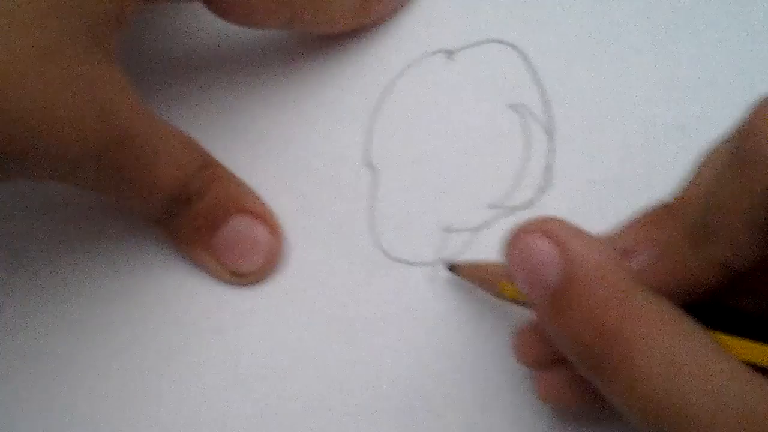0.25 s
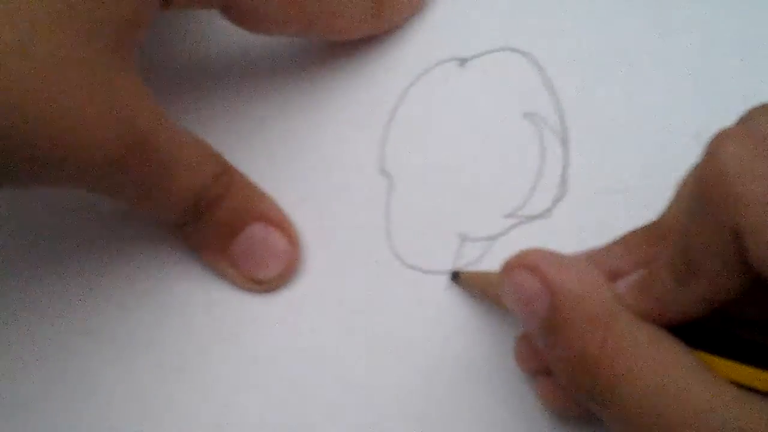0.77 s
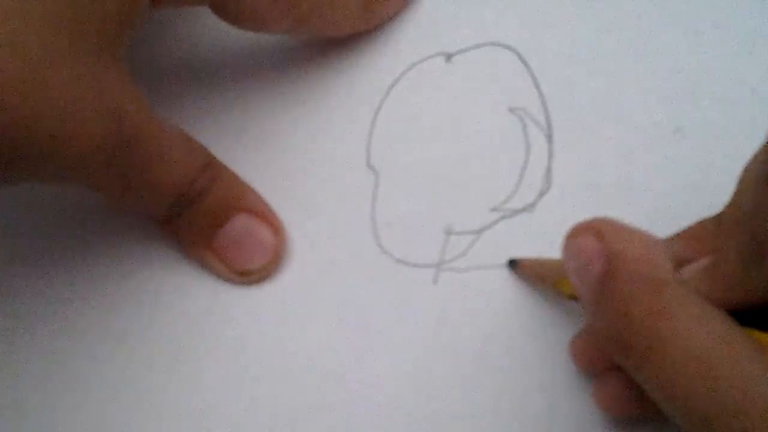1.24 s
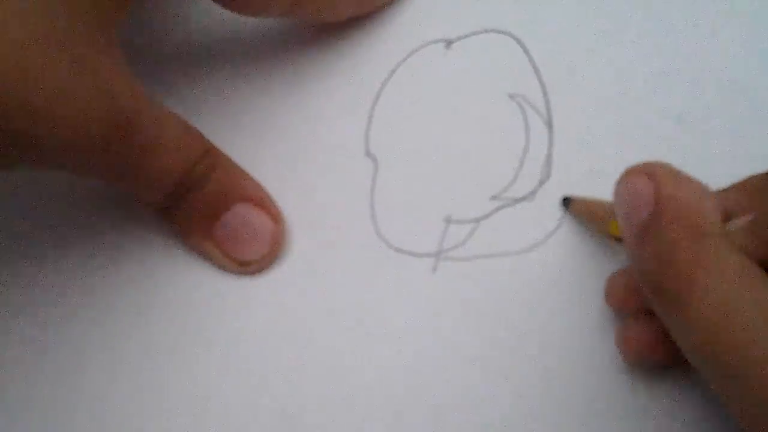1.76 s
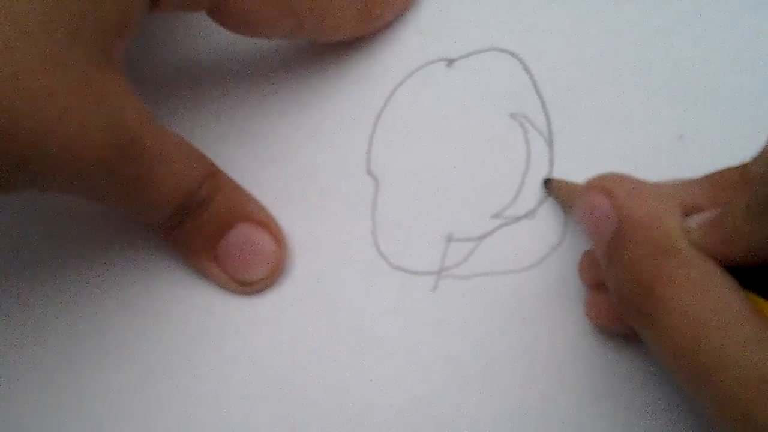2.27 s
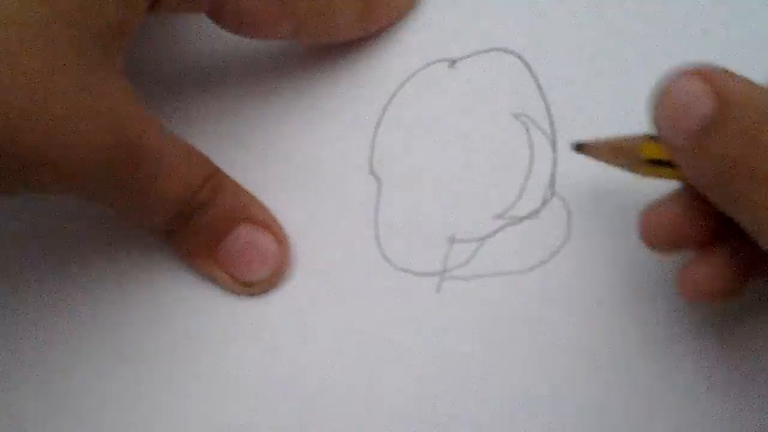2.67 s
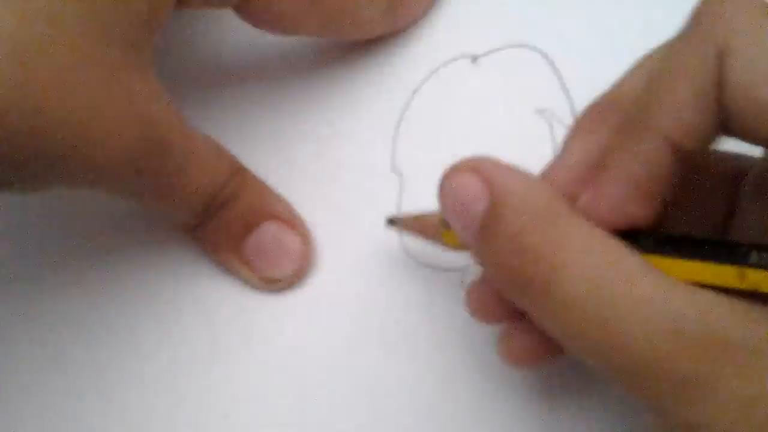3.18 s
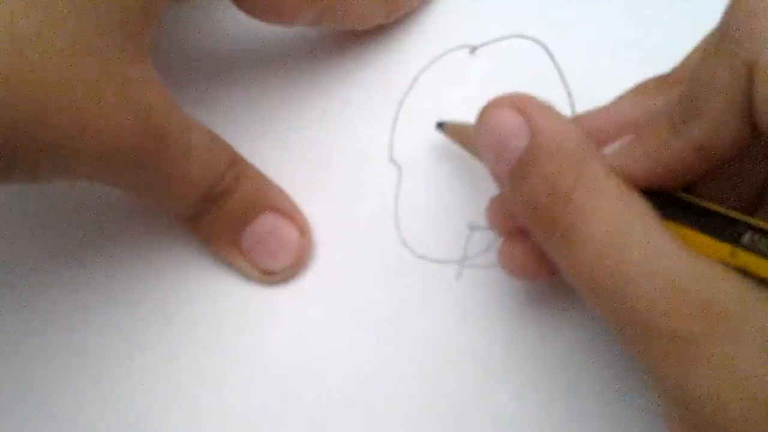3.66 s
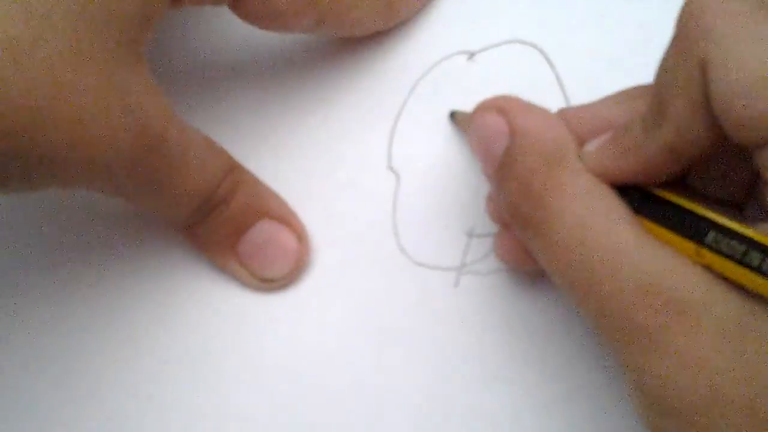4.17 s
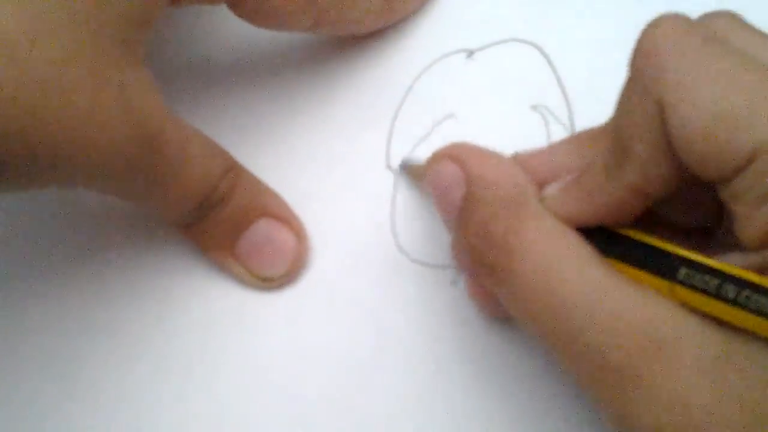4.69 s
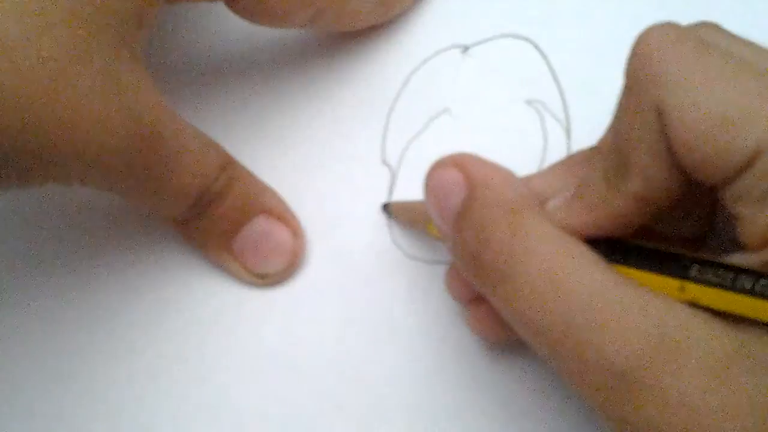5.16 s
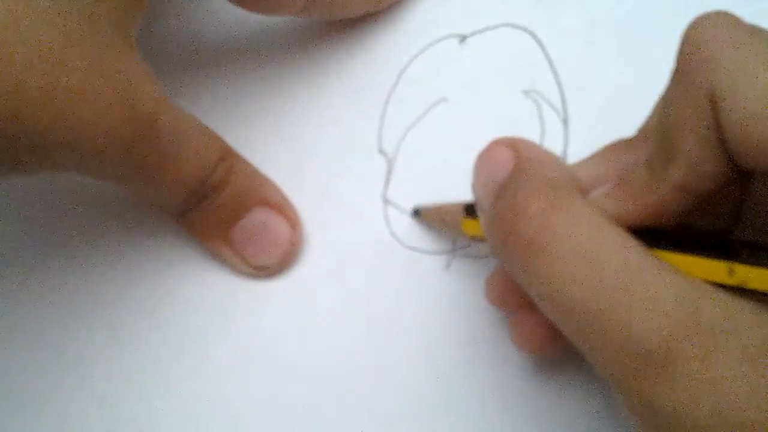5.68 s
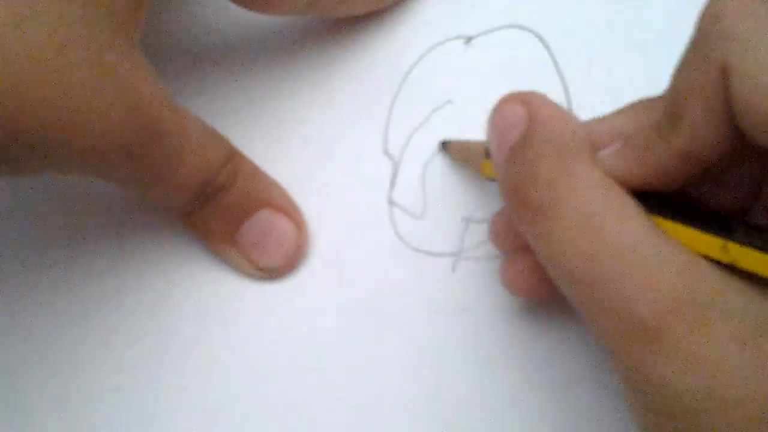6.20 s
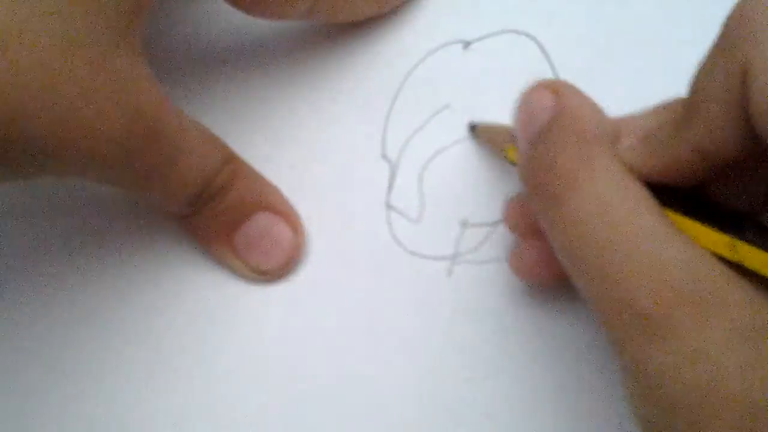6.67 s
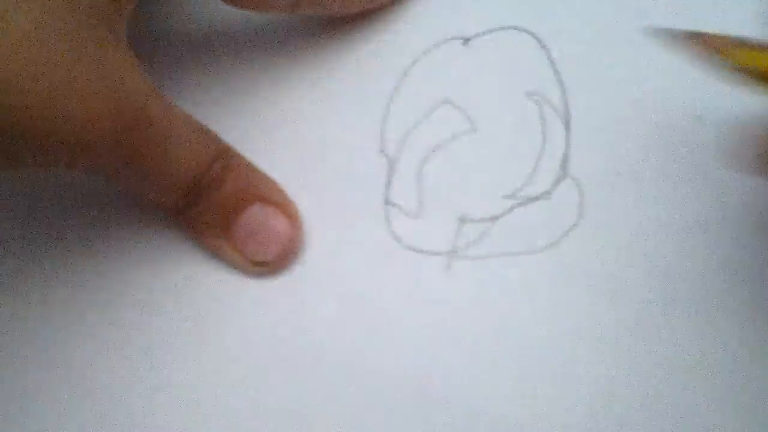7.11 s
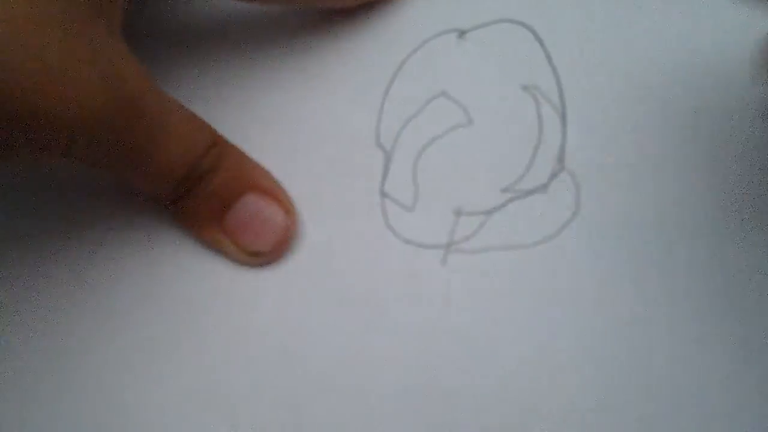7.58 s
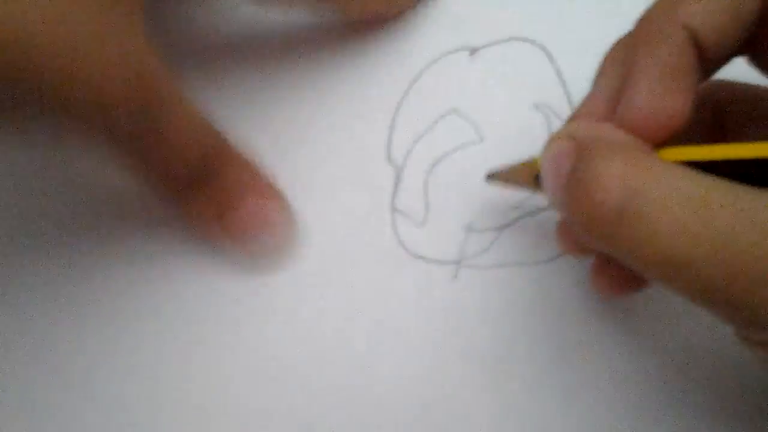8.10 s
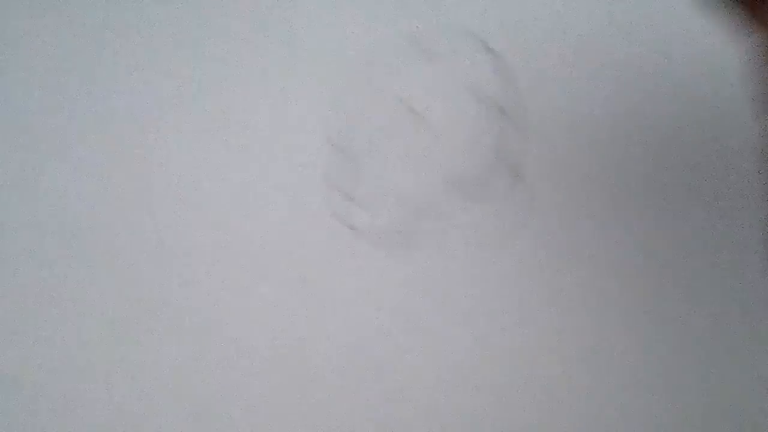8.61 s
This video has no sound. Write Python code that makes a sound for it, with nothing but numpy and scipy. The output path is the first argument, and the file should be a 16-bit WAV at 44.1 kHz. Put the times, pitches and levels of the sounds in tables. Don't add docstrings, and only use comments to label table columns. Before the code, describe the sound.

A pencil scratches in short, uneven strokes on paper with crisp ticks and soft hand thumps, then knocks once on a wooden table.

```python
import sys
import numpy as np
from scipy import signal
from scipy.fft import rfft, irfft, next_fast_len
from scipy.io import wavfile
from scipy.ndimage import uniform_filter1d

SR = 44100
rng = np.random.default_rng(int(sys.argv[2]) if len(sys.argv) > 2 else 0)


def dump(signal):
    limited = np.clip(np.atleast_2d(signal).T, -1, 1)
    pcm = np.round(limited * 32767).astype(np.int16)
    wavfile.write(sys.argv[1], SR, pcm)


def how_loud(loudness_db):
    steps = np.asarray(loudness_db, float) / 20
    return 10 ** steps


N = 390285

# start in seconds, peak level in dB, ring in Hz.
THUMPS = [(0.0586, -34, 950), (1.361, -29.5, 430), (1.4355, -33, 260), (1.459, -28, 400),
          (1.4832, -33, 310), (1.5212, -32, 300), (1.5995, -32, 545), (2.556, -41, 474), (2.826, -39, 510),
          (3.0845, -19.5, 384), (3.463, -24.5, 260), (3.486, -28.5, 514), (4.153, -37, 513),
          (4.1857, -33, 567), (4.2768, -34.5, 580), (4.3214, -38.5, 247), (5.2415, -39.5, 960),
          (6.1228, -27.5, 610), (6.1372, -32, 322), (6.334, -39, 445), (7.0043, -24.5, 900),
          (7.0538, -28, 360), (7.1927, -27, 320), (7.4625, -21.5, 536), (7.5089, -29, 250),
          (8.5012, -24, 496), (8.5737, -25.5, 289), (8.59, -21, 500), (8.6503, -25, 720),
          (8.724, -30.5, 640)]
# start in
# seconds, peak level in dB, ring in Hz.
NUDGES = [(1.418, -31, 600), (1.3485, -36.5, 267), (1.552, -36.5, 250), (4.006, -40, 327),
          (4.071, -40, 530), (4.123, -34.5, 554), (4.232, -37.5, 474), (6.1158, -31, 330),
          (7.205, -30, 297), (7.2947, -31, 277), (7.486, -35, 405), (7.997, -32.5, 435), (8.015, -35, 530),
          (8.479, -30, 590), (8.7852, -35, 560), (8.2675, -9, 590), (8.2742, -10, 590)]
# pitch in Hz, level in dB, decay (t60) in seconds.
STRUCK = [(337.7, -4, 0.3), (591, 2.5, 0.12), (662, -3, 0.06), (877, -1.5, 0.043), (956, -5.5, 0.18),
          (1275, -7.5, 0.042), (1714, -35, 0.07), (2000, -11, 0.04), (2400, 0.5, 0.013), (2830, 3.5, 0.021),
          (3600, -33, 0.076), (4950, -1, 0.013), (7600, -7.5, 0.0045)]
# centre in Hz, width in Hz, level in dB.
PENCIL = [(1220, 1270, 4.5), (2000, 1450, 10)]


def rms_one(x):
    return x / np.sqrt(np.mean(x ** 2) + 1e-20)


def edge(x, hz, kind, order=2):
    hz = np.clip(hz, 10, .45 * SR)
    return signal.sosfilt(signal.butter(order, hz, kind, fs=SR, output="sos"), x)


def fibre_hiss(x):
    return edge(edge(x, 4800, "high"), 10200, "low", order=1)


def drift(rate):
    r = np.exp(-2 * np.pi * rate / SR)
    settle = 9000
    wander = signal.lfilter([1], [1, -2 * r, r * r], rng.standard_normal(N + settle))
    return rms_one(wander[settle:])


def ring(x, hz, t60):
    r, w = how_loud(-60 / (t60 * SR)), 2 * np.pi * hz / SR
    return signal.lfilter([0, np.sin(w)], [1, -2 * r * np.cos(w), r * r], x + 1e-18)


def body(x, modes):
    out = 0
    for k, (hz, width, db) in enumerate(modes):
        r = np.exp(-np.pi * width / SR)
        a = [1, -2 * r * np.cos(2 * np.pi * hz / SR), r * r]
        resonance = (1 - r * r) / 2 * signal.lfilter([1, 0, -1], a, x)
        out = out + (-1) ** k * how_loud(db) * resonance
    return rms_one(out)


def curve(rows):
    s, db = np.transpose(rows)
    return how_loud(np.interp(np.arange(N) / SR, s, db, left=-120, right=-120))


def add(track, s, sound):
    at = round(s * SR)
    track[at:at + len(sound)] += sound[:N - at]


def unit_click(size):
    return np.eye(1, size)[0]


def rubbing():
    # time in seconds, sheet ring in dB, pencil shaft in dB.
    pressed = [(0, -1.5, 2), (2.0, -2.5, 2.5), (2.7, -1.5, 3.5), (3.4, 2, -1), (3.8, 2, 0.5),
               (4.45, -2.5, -0.5), (4.8, -2.5, 0), (5.3, -3, 2.5), (6.0, -1, 2), (6.15, -3, -1),
               (6.6, -4.5, 4), (7.0, 2, -0.5), (8.1, 2, -0.5), (8.4, -2, 3), (8.85, 0, 3)]
    # centre in Hz, width in Hz, level in dB.
    table_modes = [(162, 172, -10), (260, 165, -1), (400, 297, -0.5), (580, 154, 1), (850, 334, -11)]
    # centre in Hz, width in Hz, level in dB.
    sheet_modes = [(3700, 765, 11.5), (4700, 2560, -0.5)]
    pencil, table, bare = strokes()
    s, *columns = np.transpose(pressed)
    sheet_db, shaft_db = [np.interp(np.arange(N) / SR, s, c) for c in columns]
    force = fibres()
    hiss = rms_one(fibre_hiss(force))
    middle = how_loud(shaft_db) * body(force, PENCIL) + lead(force)
    middle = middle - how_loud(sheet_db - 0.5) * body(force, sheet_modes)
    through = edge(middle, 9600, "low") + how_loud(-4.5) * crackle()
    return pencil * through + table * body(force, table_modes) + bare * hiss


def strokes():
    # fastest moment, rise and fall in seconds,
    # pencil and sheet level in dB, table relative to it in dB; the next three tables alike.
    scratches = [(0.229, .063, 0.092, -43, 0), (0.389, .072, .14, -63, 5), (0.506, .041, .063, -56.5, 2.5),
                 (0.745, .073, 0.051, -49, 4), (1.351, 0.02, .077, -55.5, 6), (1.426, .052, 0.26, -54, 4.5),
                 (1.671, .028, 0.09, -62, 6), (1.837, .13, .099, -55.5, 2.5), (2.021, 0.042, .26, -57.5, 1),
                 (2.281, .057, 0.057, -56, 2), (2.392, 0.079, .076, -65.5, 4), (2.498, .078, .033, -66, 6),
                 (2.674, .2, .15, -64, 5), (2.778, .03, .16, -60.5, 5), (2.965, .013, .055, -60, 2),
                 (3.07, .13, 0.12, -53, 5.5), (3.104, .03, .035, -38, -10), (3.24, 0.042, .084, -61.5, 4.5),
                 (5.06, .1, 0.13, -72.5, 2), (5.431, .0053, 0.11, -67, 2), (5.562, .0037, .17, -67, 1.5),
                 (6.592, .098, .07, -62, 0), (6.742, .081, .027, -63, 5), (8.16, 0.083, 0.035, -35.5, -1.5)]
    # fastest moment, rise, fall in seconds, level, table in dB.
    slides = [(0.013, .044, .11, -58.5, 3), (0.616, .12, .21, -61.5, 3.5), (1.03, .43, .4, -56, 3.5),
              (1.945, .065, .064, -58.5, -1.5), (3.401, .086, .195, -55, 3.5),
              (3.838, .23, 0.075, -54.5, -1.5), (3.931, 0.055, .33, -54, -2), (4.17, 0.029, .06, -51.5, -6),
              (4.263, 0.076, 0.1, -55, -2), (4.436, 0.038, 0.063, -64, -3), (4.484, .01, 0.053, -63, 3.5),
              (4.69, 0.037, .25, -63.5, 0), (4.93, .02, 0.09, -63, 4), (5.275, 0.066, 0.076, -65, 2.5),
              (5.686, .004, 0.068, -64, -8), (5.805, .076, 0.069, -61, 4.5), (6.018, .1, 0.032, -61.5, 4),
              (6.345, 0.039, 0.06, -61.5, 2.5), (7.185, 0.4, 0.064, -48.5, 3.5),
              (7.413, 0.1, .239, -59.5, 4), (7.981, 0.25, .02, -53.5, -2), (8.021, .36, .02, -58, -2),
              (8.155, .35, .6, -50, 1), (8.583, 0.17, .018, -42.5, -1)]
    # fastest moment, rise, fall in seconds, level, table in dB.
    scuffs = [(1.164, 0.0037, 0.072, -58.5, 9), (3.18, .092, 0.041, -57.5, 3.5),
              (3.47, 0.018, 0.016, -32.5, -10), (3.533, 0.028, 0.036, -62, 2),
              (3.705, .14, 0.023, -57.5, 1), (4.705, .02, 0.18, -61.5, 5.5), (5.1, 0.018, 0.042, -77, 3),
              (7.075, 0.045, 0.057, -34, -4), (7.0, 0.058, 0.083, -44.5, 3), (7.671, 0.12, .7, -56.5, 4.5),
              (8.216, 0.0071, 0.015, -34.5, -6), (8.506, 0.16, .022, -49.5, 11),
              (8.588, 0.033, 0.18, -42, 6), (8.78, 0.025, 0.066, -51.5, 9.5), (5.245, .004, .03, -62.5, 9),
              (0.166, .004, 0.011, -51.5, -3), (0.029, .004, 0.0055, -49.5, -11),
              (6.178, 0.0044, 0.0092, -55, 3), (7.134, .003, .008, -42, -10), (3.088, .008, .03, -39, -6),
              (3.128, .02, 0.016, -41, -8), (3.452, .008, .01, -48, 3), (7.335, .025, .014, -41, -3),
              (5.475, .04, .06, -69, 1), (6.06, .05, 0.055, -62, 3), (5.988, .004, .04, -61, 2),
              (6.408, 0.027, 0.088, -58, 0), (6.86, 0.095, .1, -60, -4), (1.337, .004, 0.033, -55.5, 8.5),
              (5.16, 0.035, 0.082, -66, 0), (8.025, .02, .006, -52, -6)]
    # fastest moment, rise, fall in seconds, level, table in dB.
    drags = [(6.13, 0.027, .1, -54.5, 7), (6.19, 0.16, 0.13, -54, 0), (7.195, .006, .23, -48.5, 5),
             (7.302, 0.011, 0.051, -34.5, -4), (4.59, .02, .08, -59, -6), (6.27, .05, .07, -61, -3),
             (6.46, .04, .03, -62, 2), (7.52, 0.048, 0.024, -42.5, 1.5), (8.36, .033, 0.079, -37.5, 1)]
    t = np.arange(0, N + 44, 44) / SR
    rest_db = [[-73], [-73], [-73.5]]
    power = how_loud(rest_db) ** 2 * np.ones(len(t))
    slip_s, slip_db = 0.0042, -22.5
    slips = [(s, slip_s / 3, slip_s * 2, db + slip_db, -6.0) for s, db, hz in THUMPS + NUDGES]
    kinds = (scratches, -1), (slides, -4.5), (scuffs + slips, -6.5), (drags, -13.5)
    for rows, hiss_db in kinds:
        for s, rise, fall, db, table_db in rows:
            away = np.abs(t - s) / np.where(t < s, rise, fall)
            bell = how_loud(db - 20 * np.minimum(away, 4) ** 2.6)
            power = power + (bell * how_loud([[0], [table_db], [hiss_db]])) ** 2
    return [np.interp(np.arange(N) / SR, t, np.sqrt(p)) for p in power]


def fibres():
    grains_per_s, spread_db, clump_db = 3000, 3, 1.48
    sizes = how_loud(spread_db * np.minimum(rng.exponential(1, N), 5)) * rng.choice([-1, 1], N)
    grains = rms_one(sizes * (rng.random(N) < grains_per_s / SR))
    return (grains + rng.standard_normal(N)) * how_loud(clump_db * drift(100))


def lead(force):
    # time in seconds, centre in Hz, level in dB.
    tilt = [(0.0, 3070, 3.5), (1.26, 2970, 3.5), (1.31, 3120, 3.5), (2.93, 3020, 3.5), (3.13, 3290, 3.5),
            (3.94, 3350, 3.5), (4.09, 3050, 3.5), (6.46, 3130, 3.5), (6.51, 2730, 3.5), (6.61, 3170, 3.5),
            (6.95, 2950, 3.5), (7.07, 3370, 3.5), (7.74, 3290, 3.5), (7.91, 3510, 3.5), (8.28, 2850, 3.5),
            (8.5, 2930, 3.5), (8.53, 3140, 3.5), (8.85, 2980, 3.5)]
    s, hz, db = np.transpose(tilt)
    t = np.arange(N) / SR
    centre_hz = np.clip(np.interp(t, s, hz), 2500, 4100)
    out = 0
    for stop_hz in np.linspace(2500, 4100, 5):
        near = np.clip(1 - np.abs(centre_hz - stop_hz) / 400, 0, 1)
        out = out + near * body(force, [(stop_hz, 555, 0)])
    return how_loud(np.interp(t, s, db)) * out


def crackle():
    flecks_per_s = 270
    sizes = how_loud(5.4 * np.minimum(rng.exponential(1, N), 3.2)) * rng.choice([-1, 1], N)
    born = rng.random(N) < flecks_per_s / SR
    patch = rng.integers(0, 9, N)
    pitches = np.geomspace(1300, 5000, 9)
    return rms_one(sum(ring(sizes * born * (patch == k), hz, 6.6 / hz) for k, hz in enumerate(pitches)))


def ticks():
    # start in seconds, peak level in dB, ring in Hz.
    crisp = [(0.0185, -30, 9000), (0.029, -25, 2860), (0.163, -32, 2400), (0.1969, -18, 4250),
             (0.2231, -19, 7000), (0.7544, -23, 2920), (1.011, -24, 2000), (1.3522, -26, 4400),
             (1.4434, -25.5, 2680), (1.506, -24.5, 4200), (1.5532, -26.5, 2500), (1.819, -20, 3500),
             (1.871, -26, 3300), (1.9458, -28, 2910), (2.776, -30.5, 3000), (3.0266, -18.5, 3300),
             (3.064, -21, 3400), (3.8475, -23.5, 3600), (3.925, -21.5, 3400), (3.9424, -22.5, 3600),
             (3.963, -27, 3320), (4.008, -27.5, 3040), (4.122, -25, 2280), (4.3437, -38, 4200),
             (5.999, -24.5, 2150), (7.135, -17, 3470), (7.4045, -23.5, 3400), (8.0423, -21, 3900),
             (8.1045, -18.5, 3200), (8.678, -19, 2200), (8.695, -21, 6000)]
    # start in seconds, peak level in dB, ring in Hz.
    taps = [(0.059, -22, 1900), (1.2819, -31, 2220), (1.598, -31, 2000), (3.0863, -14, 3140),
            (3.463, -14, 3880), (3.7203, -29, 3400), (3.7477, -26, 3600), (3.775, -26, 3600),
            (3.7973, -22, 3700), (3.8283, -20.5, 3560), (4.0727, -29, 3000), (4.1724, -25, 3130),
            (5.045, -34.5, 3120), (5.2418, -31, 1410), (5.562, -37, 3200), (6.094, -31, 2600),
            (7.1768, -19, 3280), (7.2199, -14, 4560), (7.4626, -18, 1500), (7.5072, -10, 3180),
            (7.535, -11.5, 3060), (7.9138, -21.5, 3700), (7.9817, -15, 3550), (7.9977, -25, 2860),
            (8.0716, -21, 3700), (8.1225, -16, 3400), (8.1517, -13, 1920), (8.22, -9, 3020),
            (8.6135, -12, 1900), (8.662, -21, 2700)]
    # start in seconds, peak level in dB.
    flecks = [(0.388, -36), (0.703, -32), (0.8672, -35), (0.9056, -37), (1.3764, -29), (1.611, -35),
              (1.767, -34), (1.787, -34), (1.7924, -32), (2.115, -32), (3.192, -40), (3.266, -34),
              (3.863, -30), (4.0395, -31), (4.235, -32), (4.296, -35), (5.431, -43), (5.491, -41),
              (6.583, -36), (6.614, -33), (7.2685, -28.5), (7.921, -34), (8.6734, -23)]
    # start in seconds, peak level in dB (raised by 5 dB
    # below), ring in Hz.
    snaps = [(0.2219, -21, 2780), (0.7464, -29, 1240), (1.4112, -35, 2090), (1.4298, -29, 3230),
             (3.0934, -16, 3300), (3.1024, -17, 1890), (3.3787, -32, 3100), (3.758, -33, 1260),
             (3.8442, -28.5, 2960), (3.9172, -27, 2710), (3.9372, -26.5, 3450), (3.9674, -36, 2960),
             (3.9737, -34, 3830), (4.1564, -30, 3070), (4.1834, -31, 1780), (4.2767, -37, 1650),
             (4.2804, -32, 2830), (4.297, -39, 3020), (4.4714, -50, 2570), (4.5835, -43, 2470),
             (4.7217, -42, 1430), (4.7544, -47, 1200), (5.622, -45, 1500), (5.6474, -48, 2970),
             (5.6954, -44, 2980), (6.113, -35, 3140), (6.1359, -32, 3180), (6.1759, -38, 3100),
             (6.4053, -38, 2270), (6.4304, -41, 3510), (6.5234, -41, 2630), (6.5605, -36, 2650),
             (7.6585, -37, 1370), (7.8674, -35, 3630), (7.897, -28, 3730), (7.927, -32, 3270),
             (7.9474, -32, 4110), (7.9714, -21, 3830), (8.1403, -14.5, 3310), (8.1594, -18, 2550),
             (8.3746, -18.5, 2730), (8.5061, -24, 1680), (8.8024, -37, 1200)]
    rows = [(*row, -2.5, 4.4) for row in crisp]
    rows += [(*row, -29, 3.8) for row in taps]
    rows += [(s, db, 3200, -1, 4.4) for s, db in flecks]
    rows += [(s, db + 5, hz, -10.5, 4.4) for s, db, hz in snaps]
    out, click = np.zeros(N), unit_click(size=500)
    tears = rng.standard_normal((len(rows), 500)) * how_loud(-np.arange(500) * .6)
    brights = fibre_hiss(tears)
    for (s, db, hz, top_db, cycles), tear, bright in zip(rows, tears, brights):
        patch = edge(ring(click, hz, cycles / hz), .4 * hz, "high")
        snap = edge(patch, 3.1 * hz, "low") + how_loud(top_db) * bright
        add(out, s, np.sign(tear[0]) * how_loud(db) * snap)
    return out


def thumps():
    # start in seconds, peak level in dB, ring in Hz.
    jerks = [(1.335, -36.5, 240), (1.373, -39, 458), (1.403, -35, 544), (1.448, -35, 240),
             (1.501, -36, 307), (4.037, -45, 280), (4.754, -41, 662), (6.093, -37, 659), (6.128, -34, 210),
             (6.142, -31, 328), (6.177, -35, 571), (7.091, -29, 592), (7.935, -39, 563)]
    out, click = np.zeros(N), unit_click(size=3000)
    for s, db, hz in THUMPS + NUDGES + jerks:
        push = ring(click, hz, 5.5 / hz)
        add(out, s, how_loud(db + 2.5) * edge(push, 2100, "low"))
    return out


def knock():
    # start in seconds, level in dB, hardness in Hz.
    contacts = [
        (8.2487, -10, 2410),
        (8.2525, -21, 9000),
        (8.2597, -9, 8000),
    ]
    out, click = np.zeros(N), unit_click(size=9000)
    luck_db = rng.normal(0, 4.8, (len(contacts), len(STRUCK)))
    for (s, db, hard_hz), luck in zip(contacts, luck_db):
        modes = sum(how_loud(m_db + d) * ring(click, hz, t60) for (hz, m_db, t60), d in zip(STRUCK, luck))
        add(out, s, how_loud(db) * edge(modes, hard_hz, "low"))
    return out


def rattle():
    # time in seconds, level in dB.
    shudder = [(8.249, -13.5), (8.262, -15.5), (8.283, -21), (8.297, -15), (8.325, -21.5), (8.36, -29),
               (8.42, -44)]
    force = fibres()
    force = force + force[::-1]
    modes = sum(how_loud(db) * ring(force, hz, .5 * t60) / np.sqrt(t60) for hz, db, t60 in STRUCK[:-2])
    shaken_lead = [(3130, 555, 0)]
    scrape = how_loud(-0.5) * body(force, PENCIL + shaken_lead)
    return curve(shudder) * edge(rms_one(modes) + scrape, 4800, "low")


def hum():
    # time in seconds, level in dB.
    swell = [(6.765, -70), (6.78, -53), (6.85, -52), (6.875, -54), (6.905, -42), (6.95, -55), (7.0, -80)]
    tone = rms_one(ring(rng.standard_normal(N), 580, 0.063))
    strength = uniform_filter1d(np.abs(tone), size=400)
    return curve(swell) * rms_one(tone / (strength + .3))


def squeak():
    # time in seconds, level in dB.
    whistle = [(0.44, -85), (0.53, -68), (0.62, -68), (0.67, -85)]
    return curve(whistle) * rms_one(ring(rng.standard_normal(N), 4480, 0.02))


def ports(x, friction):
    lag_s, spread_hz, spread_db = 1.8e-5, 4200, -5
    size = next_fast_len(N)
    hz = np.fft.rfftfreq(size, 1 / SR)
    turn = np.exp(-1j * np.pi * hz * lag_s * np.array([[1], [-1]]))
    top = edge(friction, spread_hz, "high", order=3)
    own = edge(top * rng.choice([-1, 1], (2, N)), spread_hz, "high", order=3)
    return irfft(rfft(x, size) * turn, size)[:, :N] + how_loud(spread_db) * own


def room(x):
    t60_s = 0.062
    t = np.arange(round(.25 * SR)) / SR
    common, own = rng.standard_normal(len(t)), rng.standard_normal((2, len(t)))
    scatter = edge(common + edge(own, 1250, "high"), 6000, "low")
    tail = scatter * how_loud(-60 * t / t60_s) * (t > .004)
    return signal.fftconvolve(x[None], tail / np.sqrt(np.sum(tail[0] ** 2)), axes=1)[:, :N]


def still_air():
    return how_loud(-74) * rms_one(edge(rng.standard_normal((2, N)), 3000, "high"))


def scene():
    blow = edge(knock() + rattle(), 268, "high", order=3)
    blow = edge(blow, 10000, "low", order=4)
    friction = rubbing()
    desk = friction + ticks() + thumps() + hum() + squeak() + blow
    return ports(desk, friction) + how_loud(-19.5) * room(desk) + still_air()


def starve(x):
    low = signal.sosfiltfilt(signal.butter(12, 10600, fs=SR, output="sos"), x)
    loudness = uniform_filter1d(np.abs(x[0]), size=1300, origin=600)
    return low + (x - low) / (1 + (loudness / 0.06) ** 8)


def band_limit(x):
    return signal.sosfilt(signal.butter(12, 14750, fs=SR, output="sos"), x)


def record(dry):
    x = np.clip(edge(dry, 147, "high", order=4), -1, 1)
    loudness = uniform_filter1d(np.abs(x[0]), size=1500) + how_loud(-53)
    x = x + how_loud(-39.5) * loudness * rms_one(edge(rng.standard_normal(N), 85, "low"))
    x = signal.sosfilt(signal.cheby2(10, 40, 15450, fs=SR, output="sos"), starve(x))
    return band_limit(x)


dry = scene()
out = record(dry)
dump(out)
```